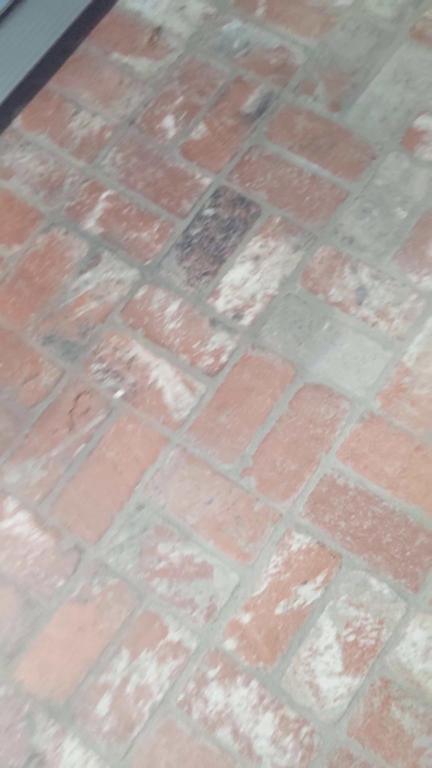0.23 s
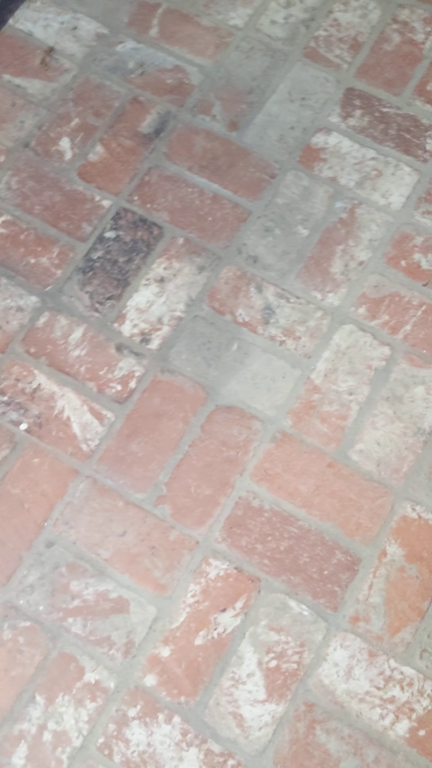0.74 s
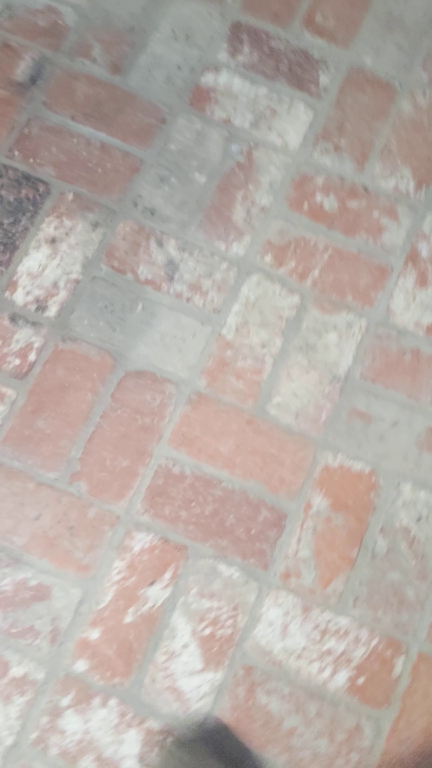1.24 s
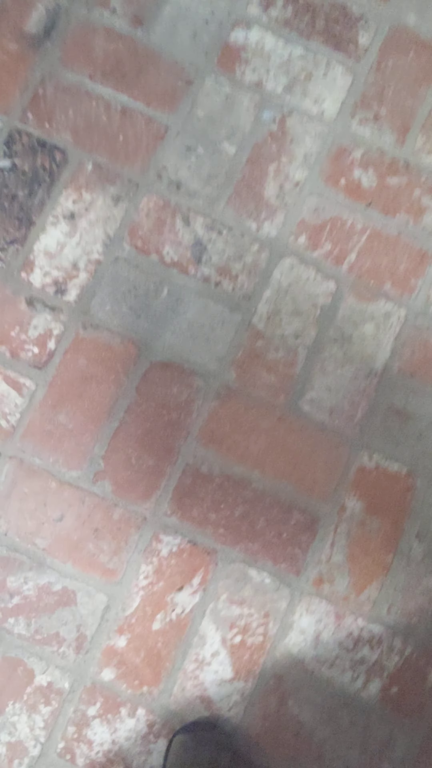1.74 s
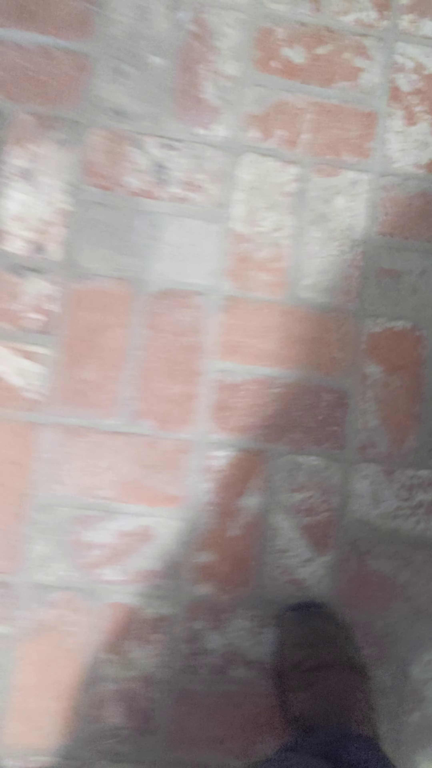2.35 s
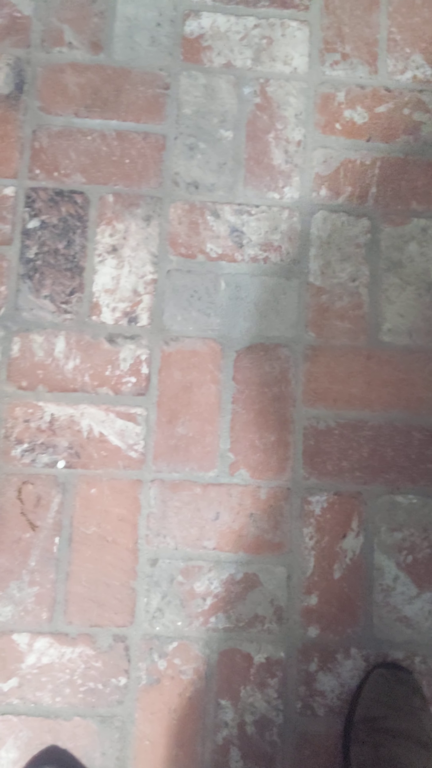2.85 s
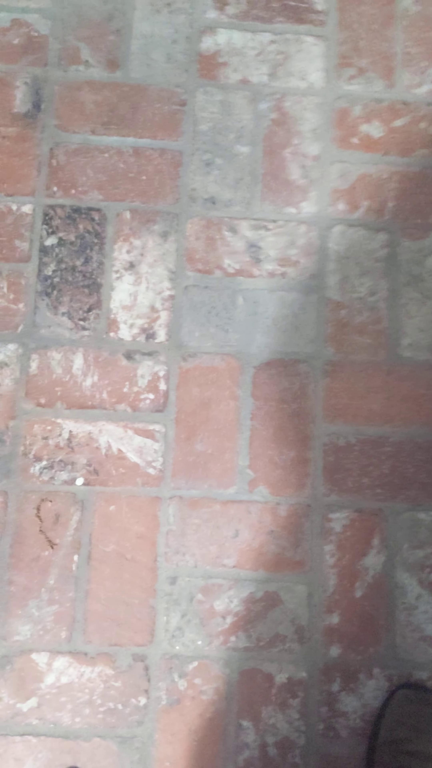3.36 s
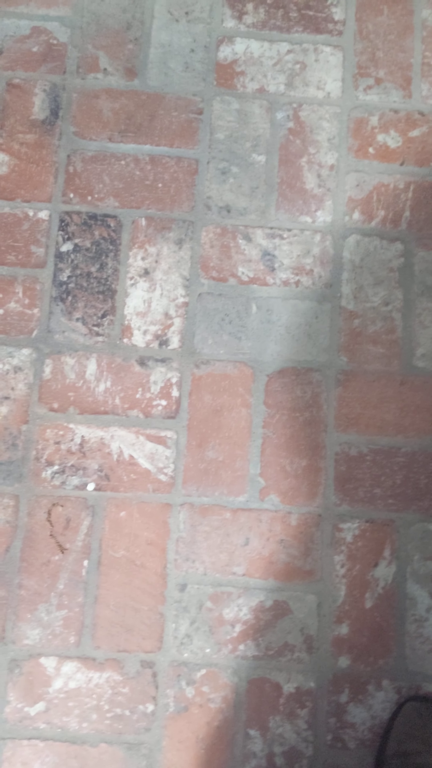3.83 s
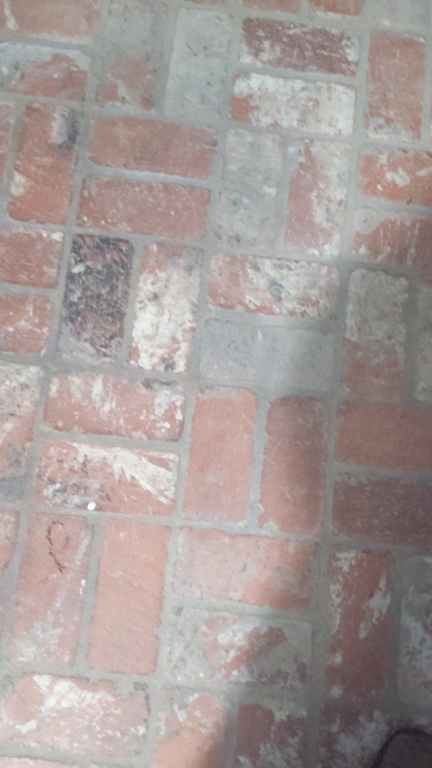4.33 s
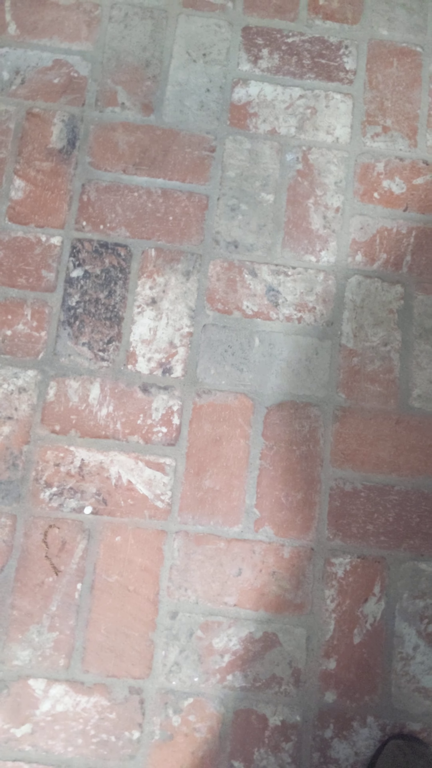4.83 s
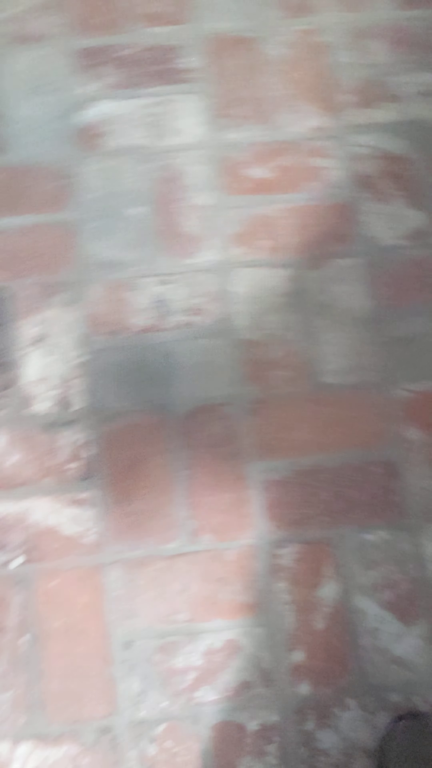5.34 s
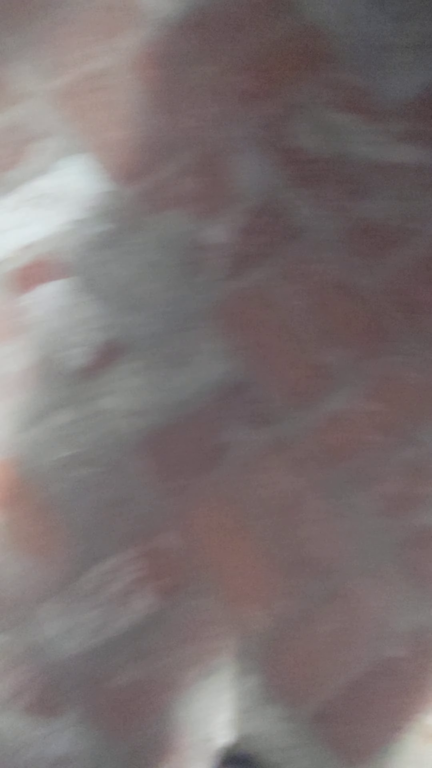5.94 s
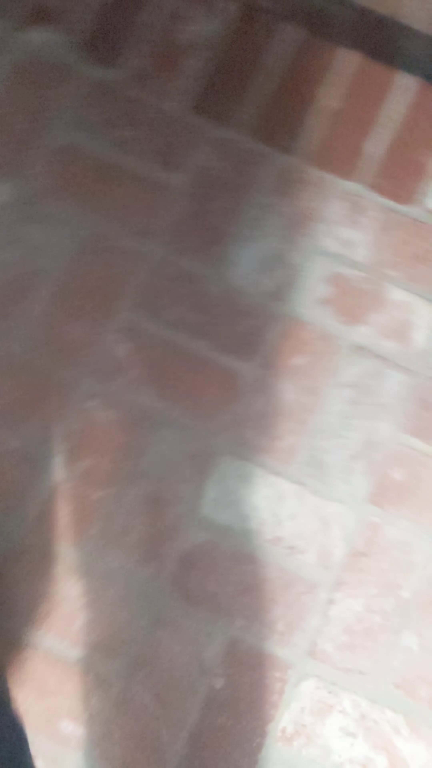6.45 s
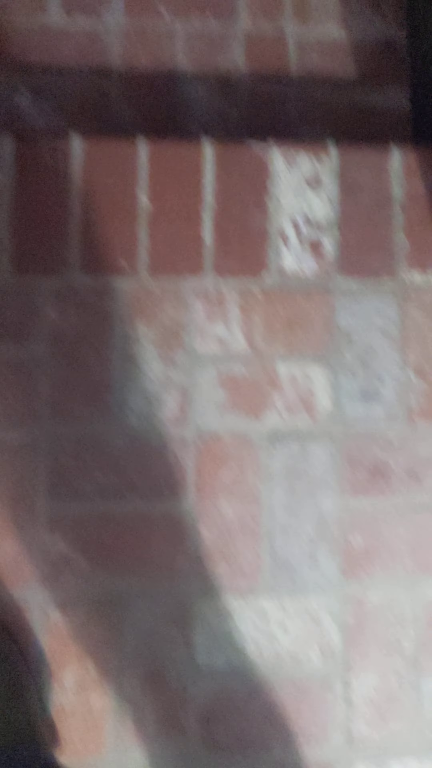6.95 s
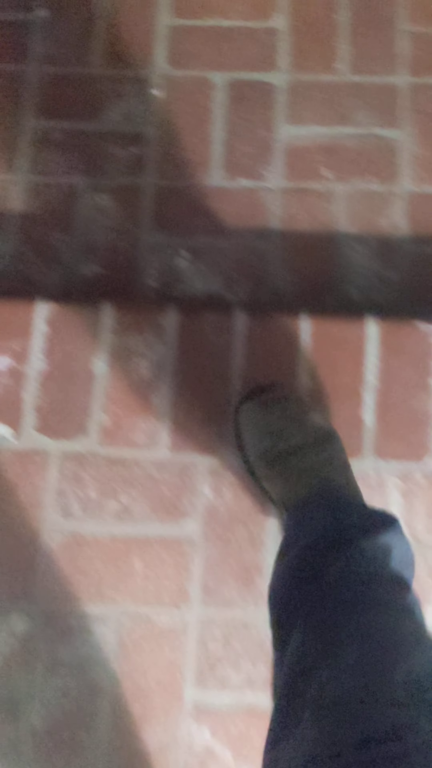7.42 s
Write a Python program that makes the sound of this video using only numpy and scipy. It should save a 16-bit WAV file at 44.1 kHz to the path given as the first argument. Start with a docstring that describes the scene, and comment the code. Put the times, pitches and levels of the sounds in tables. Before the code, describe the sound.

A leather shoe taps firmly and irregularly on outdoor brick, between handling bumps and rubs on a phone, soft scuffs and faint distant rumble.

```python
"""On a brick path beside a house wall, a leather shoe taps seven times between a few soft steps.
Each tap is a sum of damped modes, a slap of filtered noise and crushed sand, echoed by the yard.
Soles scuff, trousers swish and slides squeak: noise and random slips, filtered and shaped in level.
Fingers knock and rub on a handheld phone, whose case carries them straight to its two microphones.
Under it all lie the rumble of the hand and a quiet hum from a distant town."""
import sys
import numpy as np
from scipy import signal
from scipy.fft import rfft, irfft
from scipy.io import wavfile

SR = 44100
rng = np.random.default_rng(int(sys.argv[2]) if len(sys.argv) > 2 else 0)


def wav_record(signal):
    """Record a signal, one row per channel, as 16-bit PCM in the file named by sys.argv[1]."""
    frames = np.transpose(np.atleast_2d(signal))
    bounded = np.clip(frames, -1, 1)
    # unit amplitude maps onto the largest positive 16-bit level
    quanta = np.round(bounded * 32767).astype(np.int16)
    wavfile.write(sys.argv[1], SR, quanta)


N = 338688
T, HZ = np.arange(N) / SR, np.fft.rfftfreq(N, 1 / SR)

# In every spectrum table, density_db is the relative level in dB per Hz.
# Sole on brick: start_s, level_db (relative), pitch_factor, second_contact_delay_s, second_contact_db,
# hardness_db_per_octave, weight_db
TAP_EVENTS = [(0.5324, -46.5, 0.93, .004, -10, 3, 2), (1.08, -37, 0.97, 0.0062, -27, -4, -6),
              (1.9139, -40.5, 0.92, 0.0042, -5.5, -5, -2), (2.7155, -22, 1.015, 0.0052, -4.5, -4, -2.5),
              (3.0472, -17, 0.99, .0055, -5.5, -0.5, 1.5), (3.2343, -18, 1.02, 0.0051, -6, 0.5, -1),
              (3.4073, -23, 0.99, 0.0025, 2.5, -1.5, -5), (3.7684, -16, 0.99, .0023, 4, 1.5, -1),
              (4.4601, -20, .94, 0.00608, -1, 0, 2.5), (4.8009, -17, 0.98, 0.00576, -4.5, 2.5, 6.5),
              (5.2855, -45.5, 0.94, .004, -15, -1.5, 0), (5.502, -30.5, 0.95, 0.0045, -16, 0, -3),
              (5.679, -38, 0.95, .0065, -6, -4.5, -8)]
# Modes of the sole and the air under it: pitch_hz, level_db (relative), t60_s
SOLE_MODES = [(61.6, -12, 0.32), (181, -6.5, 0.11), (331, 1, 0.049), (406.6, 3, 0.039), (500, -14.5, 0.013),
              (634, -6.5, 0.16), (795, -22.5, 0.13), (994, 1, 0.042), (1145, -26, 0.069), (1480, -7, 0.042),
              (1610, -22, 0.013), (311, -20, 0.8)]
# Broad slap of leather: frequency_hz, density_db
SLAP_SPECTRUM = [(50, -2.5), (110, -5), (190, 5), (270, 2), (340, 0.5), (500, -0.5), (950, 0.5),
                 (1250, -10.5), (1550, -7), (1900, -21), (3000, -30.5), (8000, -83)]
# Sand crushed under the sole: frequency_hz, density_db
GRIT_SPECTRUM = [(300, -16), (1000, -1.5), (2000, -4), (2600, -4), (3400, 1), (4200, -1.5), (5500, -9),
                 (7500, -15.5), (11000, -17.5), (16000, -22)]
GRIT_DB = -21  # crushed sand, relative to the tap level
# Decay of the house echo: frequency_hz, t60_s
ECHO_DECAY = [(80, .5), (300, 0.41), (700, 0.26), (1600, 0.28), (4000, 0.39), (12000, 0.2)]
# Strength of the house echo: frequency_hz, level_db
ECHO_LEVEL = [(70, 1.5), (200, -9), (350, -1.5), (800, -4.5), (1500, -6), (3300, 4), (12000, 2)]
# Soles sliding and trouser legs brushing: start_s, hiss_db, rise_s, t60_s, body_db
SCUFF_EVENTS = [(.532, -53.5, .002, 0.17, -57), (.668, -59, 0.0018, 0.056, -56),
                (1.361, -45, 0.0058, 0.49, -47), (1.53, -55.5, 0.034, .7, -58),
                (1.94, -54.5, 0.044, 0.44, -54), (2.21, -72, 0.033, 0.36, -64),
                (2.488, -48, 0.059, 0.58, -75), (5.2, -84, 0.1, 0.6, -71), (5.496, -47, 0.004, .22, -54),
                (6.1, -64, 0.023, 1, -70), (6.248, -45, 0.036, .15, -64), (6.36, -62, 0.17, 0.62, -63),
                (7.02, -37.5, .09, 0.62, -52)]
# Fine hiss of cloth, soles and fingernails: frequency_hz, density_db
SWISH_SPECTRUM = [(500, -4), (2000, -8), (3000, -1.5), (3900, 1), (5500, -1), (7000, -6.5), (10000, -11),
                  (16000, -14)]
# Dull body of a scuff: frequency_hz, density_db
SCUFF_BODY_SPECTRUM = [(60, -26), (200, -1), (450, 2), (1000, -3.5), (2000, -29), (5000, -57)]
# The walker comes up, steps into place, turns and walks off: start_s, end_s, clothes_db, hand_rumble_db
WALKER_MOVES = [(0, 1.063, -66.5, -48), (1.07, 2.6, -62.5, -51), (5.193, 6.54, -64.5, -69),
                (6.548, 7.717, -61, -41)]
EASE_S = 0.13  # a move starts and stops over this time
# Fingers bumping the case: start_s, push_db (relative), upper_edge_hz, chatter_t60_s,
# chatter_db (relative to the first push), click_db (relative)
KNOCK_EVENTS = [(.008, -25, 525, 0.13, 12, -54), (.104, -16, 304, 0.47, 8, -40),
                (.338, -23, 520, 0.089, -6, -45), (.347, -12, 646, 0.17, 8, -34),
                (.3754, -23, 1630, 0.026, 3, -34), (0.899, -27, 171, 0.054, 5, -56),
                (.933, -19.5, 324, 0.045, 7, -54), (.943, -20, 520, .1, 2, -66),
                (.954, -22.5, 227, 0.15, 2, -70), (1.317, -24.5, 173, 0.12, -1, -64),
                (1.409, -26.5, 490, 0.24, 23, -58), (1.492, -29, 220, .06, 0, -64),
                (1.675, -19, 227, 0.079, -2, -62), (2.027, -21, 220, 0.076, 9, -66),
                (2.081, -20, 153, .05, -4, -70), (2.094, -0.5, 760, 0.056, 0.5, -32),
                (2.0954, -11, 1380, 0.065, 10, -28.5), (2.111, -3.5, 660, 0.2, 8, -44),
                (2.128, -7.5, 300, 0.044, -6, -54), (2.286, -27.5, 70, .15, -1, -70),
                (6.0464, -23, 660, 0.095, -3, -43), (6.236, -12, 545, 0.21, -2.5, -31),
                (6.551, -21.5, 720, 0.29, 14, -39), (6.599, -31, 1090, .04, 7, -31),
                (6.792, -31, 900, .066, 9, -45), (6.95, -11.5, 1010, 0.038, 3, -44),
                (7.151, -22.5, 129, 0.053, -15, -50), (7.211, -17, 89, 0.14, 3, -60),
                (7.321, -25, 1070, 0.16, 8, -31), (7.419, -44, 700, .036, 20, -33),
                (7.547, -44, 600, .05, -2, -30), (7.572, -23, 130, 0.22, 9, -50),
                (7.643, -27.5, 1090, .041, 4, -32.5), (7.659, -13.5, 430, 0.2, 0, -52)]
# Strokes of skin over the case: peak_s, rise_s, fall_s, groan_db, groan_lower_edge_hz,
# groan_upper_edge_hz, hiss_db, grip (0 light to 1 firm)
RUB_STROKES = [(.022, 0.082, 0.065, -55, 60, 4000, -47.5, 0.56),
               (.118, 0.083, 0.092, -42, 40, 3000, -50, 0.4),
               (0.273, 0.15, 0.1, -49, 40, 5000, -37.5, 0.13),
               (0.349, 0.04, 0.021, -28, 150, 5500, -48, 0.3),
               (2.199, 0.17, 0.073, -26.5, 287, 740, -78, .5),
               (6.634, 0.11, 0.11, -45.5, 40, 3930, -54, 0.5),
               (6.735, 0.085, 0.032, -36, 200, 5000, -44, 0.95),
               (6.883, 0.095, .15, -21.5, 40, 5960, -37.5, 0.69),
               (7.113, 0.19, 0.23, -29.5, 30, 7000, -34, 0.91),
               (7.34, 0.059, .1, -34, 150, 4000, -45.5, .8), (7.56, 0.14, 0.17, -36.5, 40, 4000, -45.5, .8),
               (7.652, 0.011, 0.016, -28, 100, 3000, -45, 0.9)]
# Groan of coarse slips: frequency_hz, density_db
GROAN_SPECTRUM = [(40, -3.5), (150, -3.5), (400, -3.5), (650, -7), (850, -10), (1100, -16.5), (1550, -18),
                  (2000, -24), (3200, -24), (6000, -31.5), (12000, -55)]
# Hiss of a light stroke: frequency_hz, density_db
LIGHT_SPECTRUM = [(800, -2.5), (2200, -8), (3000, -12), (3900, 6.5), (4800, -1), (5700, -3.5), (6700, -4),
                  (9000, -2), (11000, -15), (16000, -26)]
# Hiss of a firm grip: frequency_hz, density_db
FIRM_SPECTRUM = [(800, 3), (2000, -7.5), (3200, 3.5), (4600, -6.5), (5600, -1.5), (7000, -11), (9000, -21),
                 (12000, -17), (16000, -19)]
# A stroke is this much weaker one rise before or one fall after its peak; 1 = pointed top, 2 = round
STROKE_FADE_DB, STROKE_ROUND = 21, 1.6
# Sliding finger or sole: start_s, length_s, first_pitch_hz, last_pitch_hz, level_db
SQUEAK_EVENTS = [(.085, .21, 4080, 3900, -46.5), (0.273, .092, 2400, 1590, -44.5),
                 (2.501, 0.13, 5430, 5360, -53), (7.379, .02, 5900, 5850, -43.5)]
# Rumble of the hand: frequency_hz, density_db
RUMBLE_SPECTRUM = [(15, -12.5), (30, -1.5), (70, -2.5), (170, -9.5), (300, -19.5), (600, -21.5),
                   (1500, -48.5)]
STILL_DB = -60  # rumble of the hand held still
# Distant town: frequency_hz, density_db
HUM_SPECTRUM = [(20, 0.5), (65, 2.5), (110, -13.5), (180, -12), (300, -21), (420, -23.5), (800, -20),
                (1300, -27), (2100, -35), (3700, -31.5), (6000, -37.5), (16000, -47)]
HUM_DB = -50.5
# Likeness of the two microphones for airborne sound: frequency_hz, likeness (0 to 1)
AIR_LIKENESS = [(80, 1), (300, 0.89), (800, 0.22), (2000, 0.2), (6000, 0.71), (15000, 0.6)]
# Likeness of the two microphones for sound through the case: frequency_hz, likeness (0 to 1)
CASE_LIKENESS = [(50, 0.9), (250, 0.8), (800, 0.6), (2000, 0.16), (5000, 0.028), (15000, 0.061)]
# Lag of the left microphone for airborne sound: frequency_hz, lag_rad
AIR_LAG = [(20, 0.21), (100, 0.38), (300, 0.97), (700, 1.81), (1200, 1), (2000, 0.15), (3000, 1.6),
           (16000, 1.55)]
# Resonances and dips of the microphone ports: centre_hz, width_hz, level_db
PORT_RESONANCES = [(3530, 320, 1.5), (4720, 790, -4.5), (5660, 830, 5), (6440, 440, -2), (7540, 490, 6.5),
                   (9480, 510, 5), (13800, 640, 1.5)]
EDGE_HZ = 15950  # upper band limit


def amp(db):
    """Logarithmic level: converts decibels to gain."""
    return 10 ** (np.asarray(db) / 20)


def unit(x):
    """Normalisation: scales to rms 1."""
    return x / np.sqrt(np.mean(x ** 2) + 1e-20)


def decay(t, t60):
    """Exponential damping: falls by 60 dB in t60 seconds."""
    return np.exp(-np.log(1000) * t / t60)


def read(points, hz):
    """Interpolation: joins (Hz, value) points on a log-frequency axis."""
    f, value = np.transpose(points)
    return np.interp(np.log(hz + 1), np.log(f + 1), value)


def colour(x, spectrum):
    """Linear filtering: weights the spectrum by a (Hz, dB) table."""
    size = x.shape[-1]
    gain = amp(read(spectrum, np.fft.rfftfreq(size, 1 / SR)))
    return irfft(rfft(x) * gain, size)


def add(mix, s, sound):
    """Superposition: mixes a sound in at time s."""
    part = mix[..., max(round(s * SR), 0):][..., :sound.shape[-1]]
    part += sound[..., :part.shape[-1]]


def noise(size=N):
    """Incoherence: two unrelated white noises."""
    return rng.standard_normal((2, size))


def grains(per_s, spread_db, size=N):
    """Stick-slip friction: two random trains of tiny slips of very unequal size."""
    height = amp(spread_db * np.minimum(rng.exponential(1, (2, size)), 3.5))
    slipping = rng.random((2, size)) < per_s / SR
    return unit(noise(size) * height * slipping)


def flutter(hz, depth_db):
    """Random amplitude modulation: a gain that wanders at rates up to about hz."""
    t = T[::64]
    lowpass = 1 + (np.fft.rfftfreq(len(t), t[1]) / hz) ** 4
    drift = irfft(rfft(rng.standard_normal(len(t))) / lowpass, len(t))
    return np.interp(T, t, amp(depth_db * unit(drift)))


def moving(start, end):
    """Motion envelope: how far a move is under way, 0 to 1."""
    return np.clip(np.minimum(T - start, end - T) / EASE_S + .5, 0, 1)


def pair(x, same, lag):
    """Partial coherence: makes two unrelated signals partly alike, the left one lagging by a phase."""
    a, b = rfft(x)
    angle = np.arccos(np.clip(read(same, HZ), 0, 1)) / 2
    left = (a * np.cos(angle) + b * np.sin(angle)) * np.exp(-1j * lag)
    right = a * np.cos(angle) - b * np.sin(angle)
    return irfft([left, right], N)


def by_air(x):
    """Airborne propagation: sound reaches the left microphone with a phase lag set by frequency."""
    return pair(x, AIR_LIKENESS, read(AIR_LAG, HZ))


def by_case(x, delay_s, flex_hz=150):
    """Bending: above its first bend the case drives the microphones oppositely, the left delayed."""
    return pair(x, CASE_LIKENESS, 2 * np.arctan(HZ / flex_hz) + 2 * np.pi * HZ * delay_s)


def yard(x, first_s=.007):
    """Reverberation: scattered echoes from wall and paving, each band dying at its own speed."""
    echoes = noise(size=SR // 2) * (T[:SR // 2] > first_s)
    hz, t, z = signal.stft(echoes, SR, nperseg=256)
    fall = np.log(1000) / read(ECHO_DECAY, hz)[:, None]
    level = amp(read(ECHO_LEVEL, hz)[:, None])
    # the root keeps the energy independent of the decay time
    z = z * level * np.exp(-fall * (t - first_s)) * np.sqrt(2 * fall / SR)
    response = signal.istft(z, SR, nperseg=256)[1]
    return signal.fftconvolve(x[None], response, axes=1)


def taps(size=8192):
    """Impact excitation: sole modes ring in two quick contacts, with a broad slap and crushed sand."""
    ring_db, ring_rise_s, ring_echo = -3, 0.0016, 0.35  # ring_echo: gain of the ring into the yard
    slap_db, slap_t60, give_s = -3, 0.082, 0.0012
    crack, crack_t60, grit_t60 = 0.62, 0.0059, 0.063  # crack: extra gain at the start of the slap
    weight_hz, top_hz = 250, 1500
    t, out = T[:size], np.zeros((2, N))
    for s, db, pitch, delay, second_db, hardness_db, weight_db in TAP_EVENTS:
        def tilt_db(hz):
            """Contact stiffness: a hard landing tilts the blow to the treble, a heavy one adds bass."""
            return hardness_db * np.log2(min(hz, top_hz) / 400) + weight_db * (hz < weight_hz)

        ring = np.zeros(size)
        for k, (hz, mode_db, t60) in enumerate(SOLE_MODES):
            mode = np.sin(2 * np.pi * hz * pitch * t) * decay(t, t60)
            ring += (-1) ** k * amp(mode_db + tilt_db(hz)) * mode
        ring *= 1 - np.exp(-t / ring_rise_s)
        second = amp(second_db) * np.interp(t - delay, t, ring, left=0)
        ring = amp(db + ring_db) * (ring + second)

        spectrum = [(hz * pitch, level + tilt_db(hz)) for hz, level in SLAP_SPECTRUM]
        slap = unit(colour(noise(size), spectrum))
        # leather gives a little, which keeps the blow dull
        slap *= np.sin(np.pi / 2 * np.minimum(t / give_s, 1)) ** 2
        burst = amp(db + slap_db) * slap * (decay(t, slap_t60) + crack * decay(t, crack_t60))
        sand = unit(colour(grains(25000, 1.5, size), GRIT_SPECTRUM))
        burst += amp(db + GRIT_DB) * sand * decay(t, grit_t60)

        # the blow arrives directly, and scattered by the yard
        add(out[0], s, ring + burst[0])
        echo = yard(burst[0] + ring_echo * ring) + yard(burst[1])
        add(out, s, echo * np.sqrt(.5))
    return by_air(out)


def scuffs():
    """Sliding friction: fine hiss over a dull body swells and fades; clothes stir during each move."""
    hiss = sum(amp(db) * moving(start, end) for start, end, db, _ in WALKER_MOVES)
    body = np.zeros(N)
    for s, db, rise, t60, body_db in SCUFF_EVENTS:
        stroke = np.clip((T - s) / rise, 0, 1) ** 2 * decay(np.maximum(T - s - rise, 0), t60)
        hiss = hiss + amp(db) * stroke
        body = body + amp(body_db) * stroke
    fine = hiss * unit(colour(grains(14000, 1.0), SWISH_SPECTRUM)) * flutter(28.0, 0.79)
    dull = body * unit(colour(noise(), SCUFF_BODY_SPECTRUM)) * flutter(43, 6.7)
    return by_air(fine + dull)


def knocks(size=8192):
    """Soft contact: a finger gives a low-passed push and chatters as it settles; the nail clicks."""
    push_db, nail_db, click_t60 = 3, -4, 0.014  # gains added to the table's push and click levels
    bass_cut_hz, uneven, delay_s = 55, 0.98, 0.00034  # uneven: gain of the second chatter signal
    t, out = T[:size], np.zeros((2, N))
    for s, db, edge_hz, t60, chatter_db, click_db in KNOCK_EVENTS:
        force = noise(size) * decay(t, t60) * [[1], [uneven]]
        force *= amp(chatter_db) / np.linalg.norm(force[0])
        force[0, 0] += 1  # the first push
        soft = signal.butter(5, edge_hz, fs=SR, output="sos")
        push = signal.sosfilt(soft, force)
        # compensates for the narrow band and for the added chatter
        push *= SR / (2 * edge_hz) / np.hypot(1, amp(chatter_db))
        push = signal.lfilter(*signal.butter(1, bass_cut_hz, "high", fs=SR), push)
        click = unit(colour(noise(size), SWISH_SPECTRUM)) * decay(t, click_t60)
        add(out, s, amp(db + push_db) * push + amp(click_db + nail_db) * click)
    return by_case(out, delay_s)


def rubs(delay_s=0.000278):
    """Stick-slip on the case: coarse slips groan, fine ones hiss, and each stroke swells and fades."""
    out = np.zeros((2, N))
    groaning = unit(colour(grains(5000, 1.75), GROAN_SPECTRUM))
    slips = grains(14000, 2.0)
    light, firm = unit(colour(slips, LIGHT_SPECTRUM)), unit(colour(slips, FIRM_SPECTRUM))
    pressure = flutter(80, 1.6)
    for s, rise, fall, groan_db, low_hz, high_hz, hiss_db, grip in RUB_STROKES:
        away = np.maximum((s - T) / rise, (T - s) / fall)  # 0 at the peak
        on = away < 2
        band = signal.butter(4, [low_hz, high_hz], "band", fs=SR, output="sos")
        groan = signal.sosfilt(band, groaning[:, on])
        hiss = (1 - grip) * light[:, on] + grip * firm[:, on]
        swell = amp(-STROKE_FADE_DB * away[on] ** STROKE_ROUND)
        out[:, on] += swell * (amp(groan_db) * groan + amp(hiss_db) * hiss)
    return by_case(out * pressure, delay_s)


def squeaks(pole_width_hz=650, swell=0.48):
    """Friction-driven resonance: tiny slips ring a broad resonance that glides down, a fuzzy rasp."""
    out = np.zeros((2, N))
    for s, length, first_hz, last_hz, db in SQUEAK_EVENTS:
        t = T[T < length]
        hz = first_hz * (last_hz / first_hz) ** (t / length)
        turn = np.exp(2j * np.pi * np.cumsum(hz) / SR)
        r = np.exp(-np.pi * pole_width_hz / SR)
        # shift the gliding pitch to 0 Hz, smooth there, and shift back
        slips = grains(4000, 1.9, SR)[:, :len(t)] / turn
        fuzz = signal.lfilter([1], [1, -2 * r, r * r], slips)
        add(out, s, amp(db) * unit((turn * fuzz).real) * np.sin(np.pi * t / length) ** swell)
    return out * flutter(60, 2.0)


def hand_rumble():
    """Structure-borne vibration: lumpy low noise from the hand, which grows with each move."""
    shake = amp(STILL_DB) + sum(amp(db) * moving(start, end) for start, end, _, db in WALKER_MOVES)
    return by_case(unit(colour(noise(), RUMBLE_SPECTRUM)) * shake * flutter(16.0, 2.7), 0)


def town_hum():
    """Diffuse ambient noise: the nearly steady, mostly low sound of a distant town."""
    return by_air(unit(colour(noise(), HUM_SPECTRUM)) * amp(HUM_DB) * flutter(18, 0.33))


def scene():
    """Superposition: feet, hand and surroundings together."""
    return taps() + scuffs() + knocks() + rubs() + squeaks() + hand_rumble() + town_hum()


def record(dry):
    """Port resonance: the ports colour the treble, the left is a little louder; then the band limit."""
    ports_db = sum(db / (1 + (2 * (HZ - hz) / width) ** 2) for hz, width, db in PORT_RESONANCES)
    heard = irfft(rfft(dry) * amp(ports_db), N) * amp([[.7], [-.7]])
    lowpass = signal.firwin(511, EDGE_HZ, window=("kaiser", 9), fs=SR)
    return signal.oaconvolve(heard, lowpass[None], "same")


dry = scene()
out = record(dry)
wav_record(out)
```